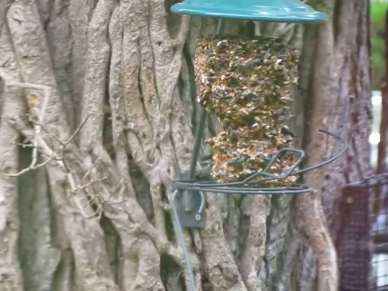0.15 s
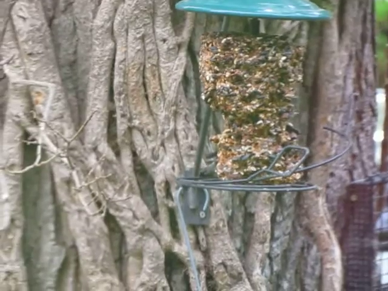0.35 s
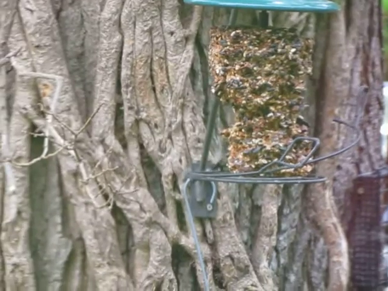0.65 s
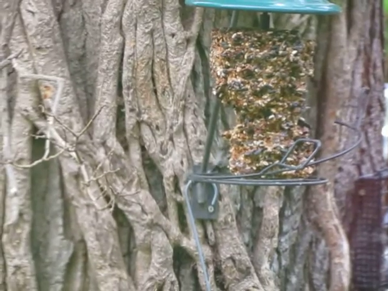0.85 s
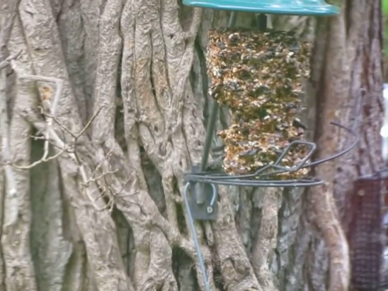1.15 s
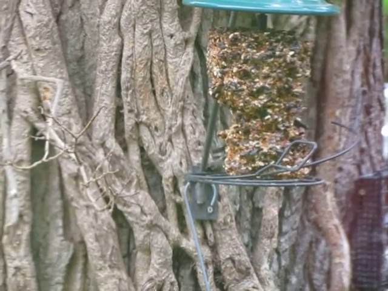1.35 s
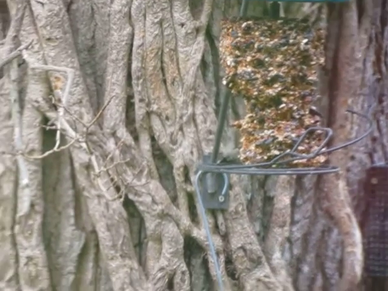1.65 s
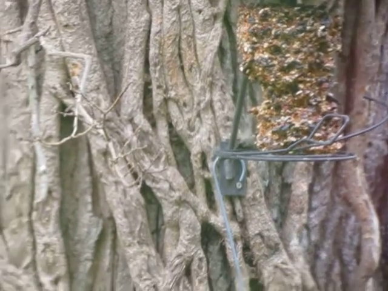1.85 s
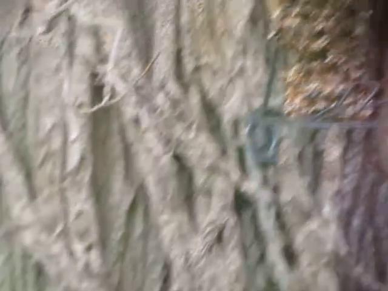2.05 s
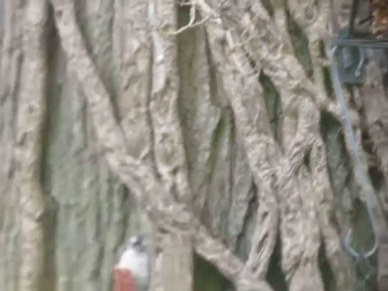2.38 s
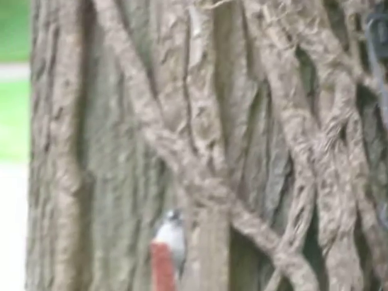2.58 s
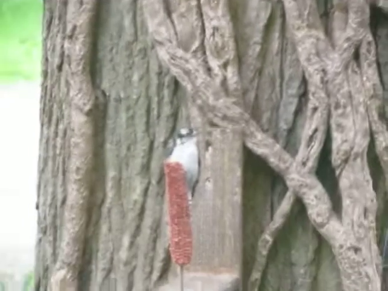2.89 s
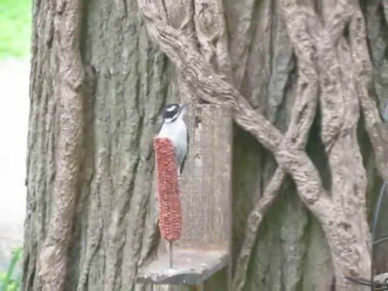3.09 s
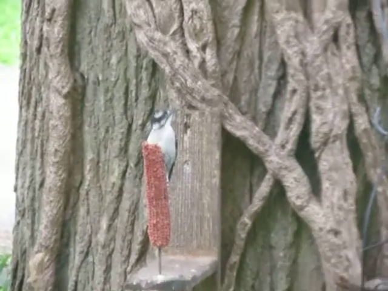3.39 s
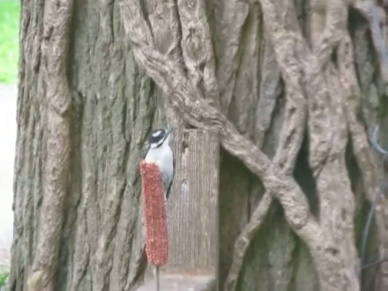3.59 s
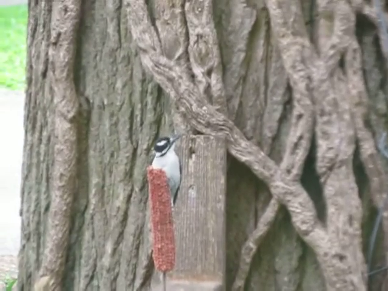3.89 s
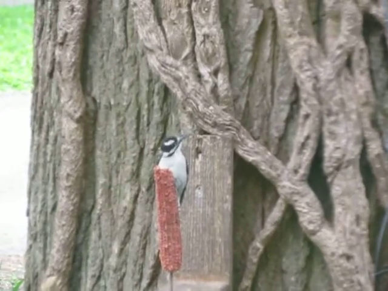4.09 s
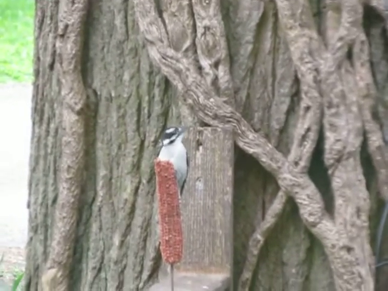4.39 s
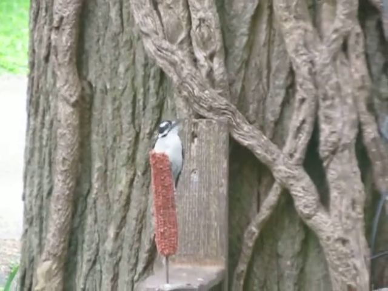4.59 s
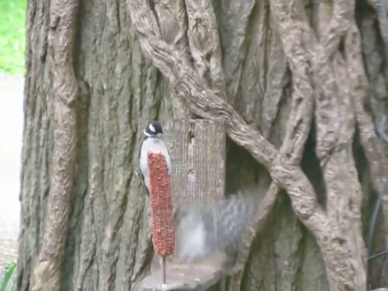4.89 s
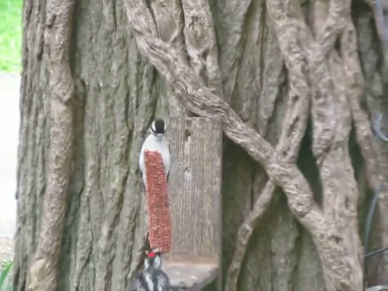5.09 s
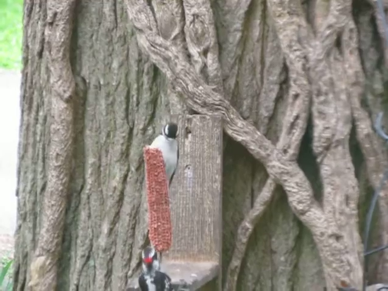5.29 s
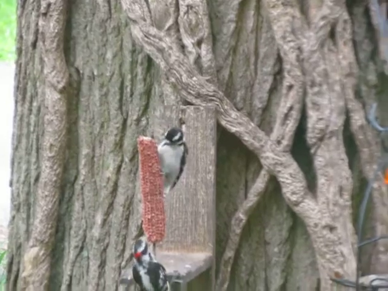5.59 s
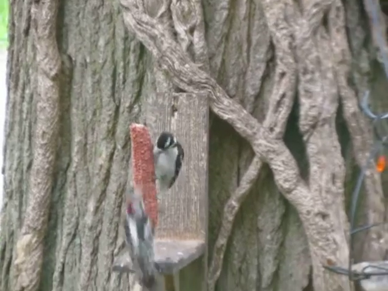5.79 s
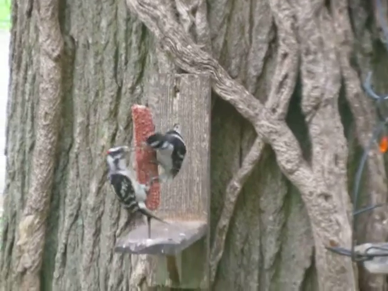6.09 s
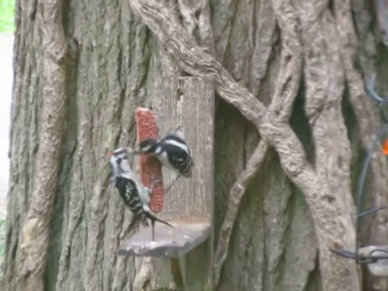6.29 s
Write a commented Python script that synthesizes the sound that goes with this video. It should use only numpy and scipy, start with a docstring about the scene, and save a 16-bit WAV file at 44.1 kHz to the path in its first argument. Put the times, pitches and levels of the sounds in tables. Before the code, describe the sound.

Over a constant low mains hum and leafy hiss, piercing upward bird whistles ring briefly among tree trunks, with faint bark ticks and far birds.

```python
"""The ringing end of a bird's rising whistle opens the scene, over an electric hum and an even outdoor hiss.
Three more sharp whistles follow: nearly pure tones that slide up and ring among trunks and walls.
The machine is a stack of sines at mains pitch plus fan noise; the air is filtered noise.
Small birds chirp far off as short hoarse glides with echoes.
Faint dry ticks and crackles from the bark are short puffs of noise."""
import sys
import numpy as np
from scipy import signal
from scipy.fft import rfft, irfft, next_fast_len
from scipy.io import wavfile
from scipy.ndimage import uniform_filter1d, map_coordinates

SR = 44100
rng = np.random.default_rng(int(sys.argv[2]) if len(sys.argv) > 2 else 0)


def int16_out(signal):
    """Quantize to a 16-bit WAV file."""
    q = np.round(np.clip(np.atleast_2d(signal).T, -1, 1) * 32767)
    wavfile.write(sys.argv[1], SR, q.astype(np.int16))


N = 284445


def amp(db):
    """Turns decibels into a gain."""
    return 10 ** (np.asarray(db) / 20)


def unit(x):
    """Scales a sound to an rms of 1."""
    return x / np.sqrt(np.mean(x ** 2) + 1e-20)


def along(points, hz):
    """Reads a curve of (Hz, value) points at any frequency, on a log axis."""
    f, v = np.transpose(points)
    return np.interp(np.log(hz + 1), np.log(f + 1), v)


def wobble(rate, size=N):
    """A smooth random curve through `rate` random points a second."""
    knots = rng.standard_normal(int(size * rate / SR) + 4)
    return map_coordinates(knots, [np.arange(size) * rate / SR])


def filtered(x, response):
    """Multiplies the spectrum of x by a response, which is a function of frequency."""
    size = x.shape[-1]
    m = next_fast_len(size + 8192)
    spectrum = rfft(x, m) * response(np.fft.rfftfreq(m, 1 / SR))
    return irfft(spectrum, m)[..., :size]


def lean(left_db):
    """Left and right gains that make the left louder by left_db."""
    return amp([[left_db / 2], [-left_db / 2]])


def add(track, s, sound):
    """Mixes a sound into a stereo track at time s, dropping what falls outside the track."""
    at = round(s * SR)
    part = sound[:, max(-at, 0):N - at]
    track[:, max(at, 0):max(at, 0) + part.shape[1]] += part


# How alike wide noise is in the two ears.
# Each row: frequency in Hz, likeness of left and right (1 the same, 0 unrelated, below 0 opposed).
LIKENESS = [(60, 0.77), (120, 0.65), (250, 0.73), (500, 0.78), (1000, 0.66), (2000, 0.29), (4000, 0.26),
            (7500, -0.18), (14000, -0.42)]


def rush(colour, patchy_db):
    """Stereo noise of rms 1, patchy in time and pitch, with left and right most alike in the lower range."""
    z = signal.stft(rng.standard_normal((2, N)), nperseg=512)[2]
    patches = rng.standard_normal(z.shape[1:])
    patches = uniform_filter1d(patches, size=9, axis=0)  # blurred over frequency
    patches = uniform_filter1d(patches, size=12, axis=1)  # blurred over time
    pair = signal.istft(z * amp(patchy_db * unit(patches)), nperseg=512)[1][:, :N]

    def mid_side_response(hz):
        # this angle shares the power between mid and side to give the wanted likeness
        angle = np.arccos(np.clip(along(LIKENESS, hz), -1, 1)) / 2
        return colour(hz) * np.array([np.cos(angle), np.sin(angle)])

    mid, side = filtered(pair, mid_side_response)
    return unit(np.array([mid + side, mid - side]))


# How long the yard rings.
# Each row: frequency in Hz, time in seconds for the echoes to fade by 60 dB.
YARD_RING = [(500, 0.13), (2000, 0.63), (4300, 0.5), (9000, 0.41), (14000, 0.16)]


def yard(x, wet_db, near_gain, build_s=0.0031, near_s=0.0026):
    """The direct sound, a dense cluster of reflections from nearby trunks, and a longer tail from the walls."""
    hz, t, z = signal.stft(rng.standard_normal((3, SR * 3 // 4)), SR, nperseg=256)
    fade = amp(-60 * t / along(YARD_RING, hz)[:, None])
    build_up = 1 - np.exp(-t / build_s)
    near_cluster = 1 + near_gain * np.exp(-t / near_s)
    shape = fade * build_up * near_cluster
    left, right, shared = signal.istft(z * shape, SR, nperseg=256)[1]
    tail = np.array([left, right]) + 0.43 * shared
    echo = amp(wet_db) * tail / np.linalg.norm(tail[0])
    echo[:, 0] += 1  # the direct sound
    return signal.fftconvolve(x[None], echo, axes=1) / np.hypot(1, amp(wet_db))


# The bird's rising whistles; the first starts before the scene, so only its ringing is heard.
# Each row: start in seconds, length in seconds, starting pitch in Hz, top pitch in Hz,
# climb time in seconds, final level in dB before the fades and left-right lean, swell from start to end in dB.
WHISTLE_CALLS = [ (-0.22, 0.2, 3824, 4374, 0.22, -22, 0.5), (1.904, 0.212, 3590, 4362, 0.2, -21.8, 3.5),
                 (3.908, 0.248, 3717, 4326, 0.2, -17.5, 8), (5.53, 0.23, 3870, 4343, 0.18, -19.5, 6), ]
ATTACK_S, RELEASE_S = 0.058, 0.018  # every whistle fades in and is cut short alike
EASING = 2.2  # how strongly the climb slows towards the top pitch
SWELL_CURVE = 1.74  # above 1, the swell comes late
DROOP_HZ, DROOP_S = 66, 0.02  # the pitch sags as the whistle ends


def whistles(quaver_hz=8, climb_quaver_hz=80, rasp_hz=16, second_db=-27, third_db=-28, climb_bright_db=5):
    """A nearly pure tone slides up, swells and sags at its end; it is rougher and brighter as it climbs."""
    out = np.zeros((2, N))
    for s, length, start_hz, top_hz, climb_s, db, swell_db in WHISTLE_CALLS:
        t = np.arange(0, length, 1 / SR)
        climbing = np.clip(1 - t / climb_s, 0, 1) ** EASING  # 1 at the start, 0 at the top
        strain = np.sqrt(climbing)

        droop = DROOP_HZ * np.exp((t - length) / DROOP_S)
        pitch = top_hz - (top_hz - start_hz) * climbing - droop
        quaver = (quaver_hz + climb_quaver_hz * strain) * wobble(261.3, size=len(t))
        rasp = rasp_hz * wobble(651, size=len(t))
        phase = 2 * np.pi * np.cumsum(pitch + quaver + rasp) / SR

        second = amp(second_db) * np.sin(2 * phase)
        third = amp(third_db + climb_bright_db * strain) * np.sin(3 * phase)
        tone = np.sin(phase) + second + third

        fade_in = np.sin(np.pi / 2 * np.minimum(t / ATTACK_S, 1)) ** 2
        cut_off = np.minimum((length - t) / RELEASE_S, 1)
        level = amp(db - swell_db * (1 - (t / length) ** SWELL_CURVE))
        call = fade_in * cut_off * level * unit(tone)

        heard = yard(call, wet_db=5.5, near_gain=0.99)
        # echoes spread the energy, adding none
        same_energy = np.linalg.norm(call) / np.linalg.norm(heard, axis=1, keepdims=True)
        add(out, s, heard * same_energy)
    return out * lean(left_db=3.0)


MAINS_HZ = 60
# The hum and its overtones. Each row: multiple of the mains pitch, relative level in dB.
HUM_OVERTONES = [(1, 1), (2, -29), (3, -20.5), (4, -20), (5, -24.5), (6, -36.5), (7, -29.5), (8, -25.5),
                 (9, -28.5), (10, -25), (11, -42), (12, -50), (13, -32)]
# The machine's wavering upper tones. Each row: pitch in Hz, level in dB before whine_db and wavering.
WHINE_TONES = [(1082, -67), (1200, -65.5), (1685, -67.5), (1983, -60.5), (2041, -61), (2344, -64),
               (2450, -66.5)]
# The casing's resonances, which colour the fan noise.
# Each row: centre in Hz, width in Hz, relative level in dB.
CASING_RESONANCES = [(1760, 350, -40), (1968, 240, 6.5), (2462, 300, 4.5)]


def machine(hum_db=-33, overtone_waver_db=1.0, whine_db=-2, fan_db=-53.0):
    """A firm mains hum with a buzz of overtones, wavering upper tones and fan noise in the casing."""
    t = np.arange(N) / SR
    hum = np.zeros(N)
    for order, db in HUM_OVERTONES:
        unsteady = order > 1  # the fundamental holds still
        phase = 2 * np.pi * (order * MAINS_HZ * t + rng.random()) + unsteady * 0.25 * wobble(4.2)
        level = amp(db + unsteady * overtone_waver_db * wobble(3.117))
        hum += level * np.sin(phase)

    whine = np.zeros(N)
    for hz, db in WHINE_TONES:
        tone = unit(np.sin(2 * np.pi * hz * t + 1.4 * wobble(14)))
        whine += amp(db) * tone * amp(2.4 * wobble(3.38))

    def casing(hz):
        return sum(amp(db) / (1 + ((hz - centre) / (width / 2)) ** 2)
                   for centre, width, db in CASING_RESONANCES)

    fan = amp(fan_db) * rush(casing, patchy_db=2.5)
    return (amp(hum_db) * unit(hum) + amp(whine_db) * whine + fan) * lean(left_db=1.07)


# The colour of the distant low rumble. Each row: frequency in Hz, relative level in dB per Hz.
RUMBLE_COLOUR = [(15, -10), (35, -6), (60, -1.5), (130, -1), (280, -1.5), (380, -5), (520, -3.5),
                 (750, -7.5), (1150, -8), (1500, -10), (3000, -12.5), (8000, -45)]
# The colour of the outdoor hiss, which also tints the ticks.
# Each row: frequency in Hz, relative level in dB per Hz.
HISS_COLOUR = [(400, -49), (1500, -25), (3100, -13), (3600, 0), (4500, -2.5), (6200, -0.5), (8000, -3),
               (10300, -5), (11400, -5), (13500, -9.5), (15700, -18.5)]


def air(rumble_db=-46.5, hiss_db=-47.5, calming_db_per_s=0.21):
    """Noise as a distant low rumble and a soft, slightly restless hiss of leaves that slowly calms."""
    rumble = amp(rumble_db) * rush(lambda hz: amp(along(RUMBLE_COLOUR, hz)), patchy_db=1.9)
    breeze_db = hiss_db - calming_db_per_s * np.arange(N) / SR + 0.42 * wobble(3.35)
    hiss = amp(breeze_db) * rush(lambda hz: amp(along(HISS_COLOUR, hz)), patchy_db=1.84)
    return rumble * lean(left_db=0.6) + hiss


# The nearest of the distant chirps and low hoots.
# Each row: start in seconds, length in seconds, middle pitch in Hz, glide in octaves (below 0 falls),
# level in dB, hoarseness as a share of the pitch.
CHIRP_NOTES = [ (0.023, 0.031, 671, 0.012, -47, 0.11), (0.109, 0.018, 2103, -0.11, -38.5, 0.067),
               (0.628, 0.029, 5900, -.1, -46, 0.064), (0.971, 0.037, 3440, 0.059, -46.5, 0.075),
               (0.997, 0.031, 675, 0.055, -46, 0.091), (1.087, 0.032, 2115, -0.018, -47.5, 0.12),
               (1.747, 0.026, 2485, 0.21, -43, 0.062), (2.18, 0.043, 6030, -0.23, -47.5, 0.074),
               (2.353, 0.14, 924, -0.033, -55.5, 0.054), (2.742, 0.25, 913, -.06, -56, 0.04),
               (2.832, 0.041, 1720, -0.062, -41.5, 0.07), (2.903, 0.062, 1680, -0.019, -47.5, 0.038),
               (2.998, 0.022, 2044, -0.12, -42, 0.041), (3.8, 0.035, 3540, -0.045, -47, 0.028),
               (4.314, 0.038, 1816, -0.01, -48, 0.072), (4.602, 0.056, 1917, -0.13, -43.5, 0.047),
               (4.853, 0.031, 2390, -0.11, -44.5, 0.076), (4.993, 0.014, 6260, 0.018, -49, 0.03),
               (5.309, .03, 3310, 0.058, -51, .09), (5.377, 0.055, 2180, -0.25, -45, 0.17),
               (5.708, 0.045, 685, -0.012, -42, 0.19), (6.295, 0.032, 3150, 0.21, -49.5, 0.06), ]


def chirps():
    """Far birds: short glides made hoarse by a jittering pitch, with echoes nearly as strong as the notes."""
    out = np.zeros((2, N))
    for s, length, pitch, glide, db, hoarse in CHIRP_NOTES:
        u = np.linspace(-.5, .5, max(int(length * SR), 64))  # from start to end of the note
        hz = pitch * 2 ** (glide * u) * (1 + hoarse * wobble(638, size=len(u)))
        note = np.cos(np.pi * u) * np.sin(2 * np.pi * np.cumsum(hz) / SR)
        add(out, s, yard(amp(db) * unit(note), wet_db=-2.0, near_gain=1.9))
    return out


def chatter(count, pitch_hz, level_db, range_octaves, hoarse, spread_db):
    """Still farther birds: short hoarse glides, one at a random moment in each equal slice of the scene."""
    dry, t = np.zeros((2, N)), np.linspace(-.5, .5, SR // 40)
    for k, (when, high, glide, loud) in enumerate(rng.random((count, 4))):
        octaves = range_octaves * (high - .5) + .5 * (glide - .5) * t
        hz = pitch_hz * 2 ** octaves * (1 + hoarse * wobble(681, size=len(t)))
        note = np.cos(np.pi * t) * np.sin(2 * np.pi * np.cumsum(hz) / SR)
        start_s = (k + when) / count * N / SR
        add(dry, start_s, amp(level_db + spread_db * loud) * unit(note)[None])
    return yard(dry[0], wet_db=-1.5, near_gain=1.5)[:, :N]


def crumbs(count=45, level_db=-56, t60=.04):
    """Tiny crackles of bark and seed: fast-fading noise at random moments, brightened by a filter."""
    out, t = np.zeros((2, N)), np.arange(SR // 10) / SR
    for when, loud in rng.random((count, 2)):
        fade = amp(level_db + 11 * loud ** 2 - 60 * t / t60)
        add(out, when * N / SR, fade * rng.standard_normal((2, len(t))))
    colour = [(1500, -20), (5000, 16), (12000, 8), (15700, -12)]  # (Hz, dB)
    return filtered(out, lambda hz: amp(along(colour, hz)))


# The clearest dry ticks and scratches on the bark.
# Each row: start in seconds, level in dB before the fades and left-right lean,
# centre in Hz before the hiss colour tints it, time in seconds for a 60 dB fade.
BARK_TICKS = [ (0.099, -44.5, 8300, 0.62), (0.278, -47, 11400, 0.28), (0.525, -40, 7040, 0.32),
              (1.035, -44.5, 4000, 0.35), (1.532, -45, 3260, 0.22), (1.955, -43, 5570, 0.23),
              (2.401, -50, 3220, 0.81), (2.437, -48, 10500, 0.4), (2.874, -46.5, 4350, 0.55),
              (3.088, -42.5, 3770, 0.23), (4.759, -48, 13400, 0.3), (5.066, -45, 5600, 0.45),
              (5.25, -46.5, 11200, 0.2), (5.386, -46, 4150, 0.34), (6.372, -45.5, 11500, 0.25), ]


def ticks(width_octaves=0.38, attack_s=0.0026):
    """Each tick on the bark is a quick puff of noise in one band, without echoes."""
    out, t = np.zeros((2, N)), np.arange(SR // 3) / SR
    for s, db, centre, t60 in BARK_TICKS:
        def band(hz):
            octaves_off = np.log2((hz + 1) / centre)
            return np.exp(-.5 * (octaves_off / width_octaves) ** 2) * amp(along(HISS_COLOUR, hz))

        # separate noise on each side plus noise common to both
        noise = rng.standard_normal((2, len(t))) + rng.standard_normal(len(t))
        grit = unit(filtered(noise, band))
        add(out, s, grit * amp(db - 60 * t / t60) * (1 - np.exp(-t / attack_s)))
    return out * lean(left_db=1.0)


def scene():
    """Birds and bark sounds over the machine and the outdoor air."""
    twitter = chatter(count=36, pitch_hz=5950, level_db=-57.0, range_octaves=.5, hoarse=0.053, spread_db=8.5)
    cheeps = chatter(count=22, pitch_hz=2180, level_db=-55.5, range_octaves=0.334, hoarse=0.049, spread_db=6)
    return whistles() + machine() + air() + chirps() + twitter + cheeps + crumbs() + ticks()


TOP_HZ = 15750


def record(dry):
    """Keeps nothing at or above the top frequency."""
    return filtered(dry, lambda hz: hz < TOP_HZ)


dry = scene()
out = record(dry)
int16_out(out)
```